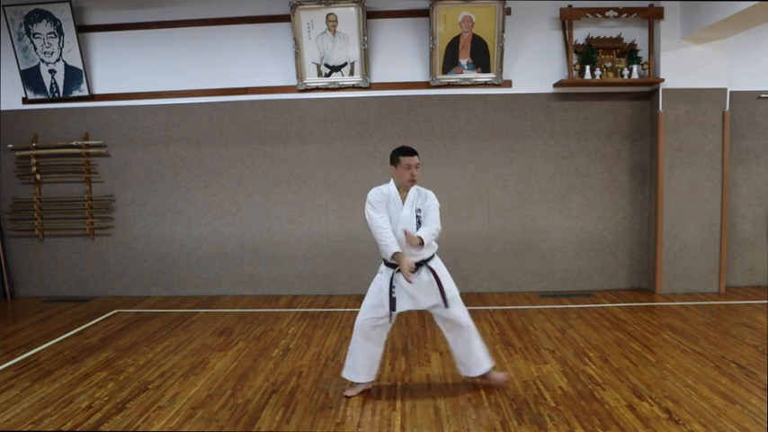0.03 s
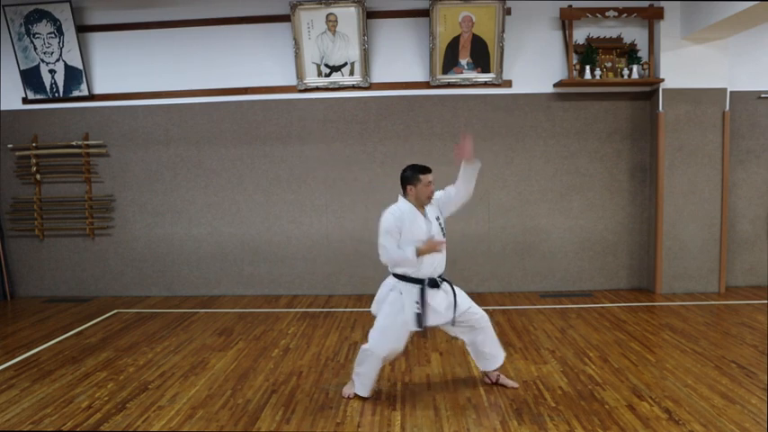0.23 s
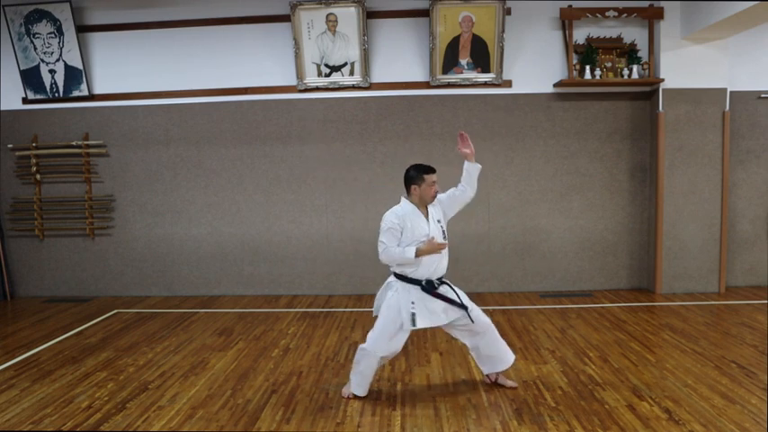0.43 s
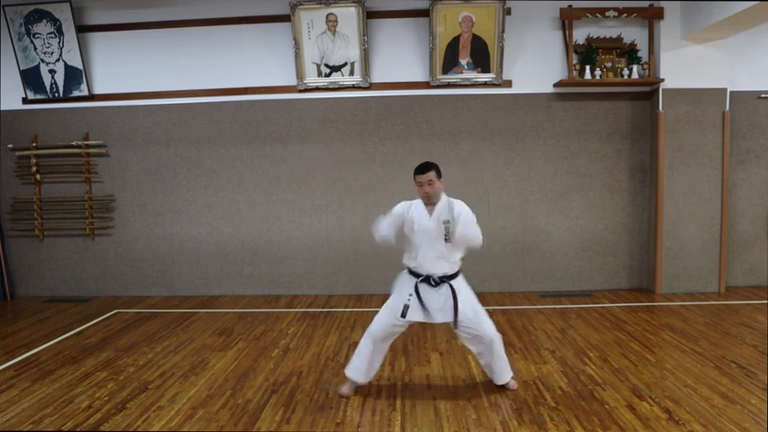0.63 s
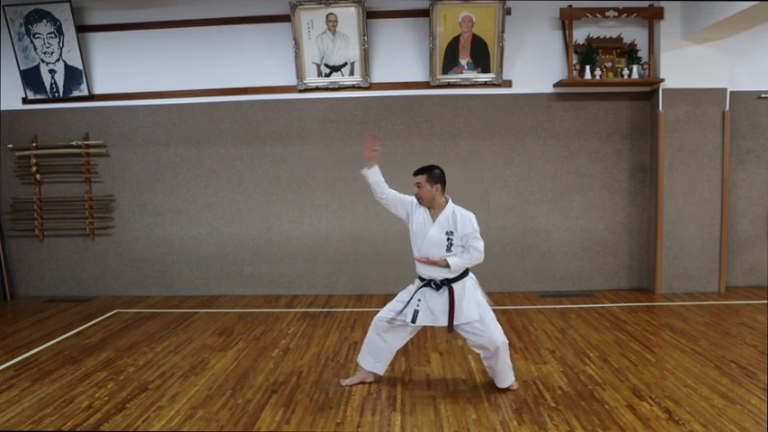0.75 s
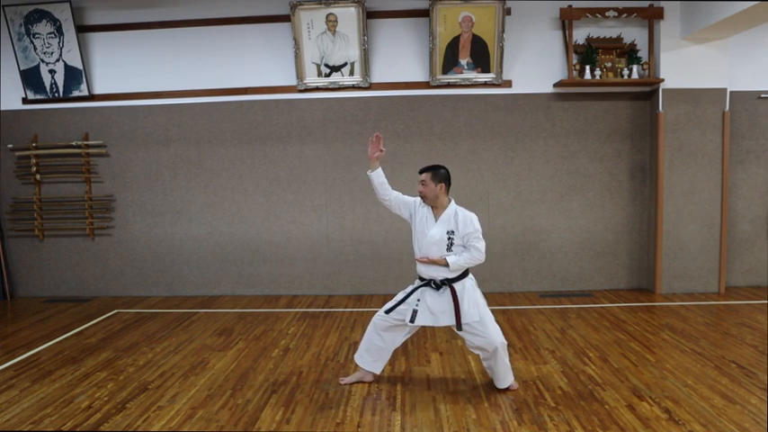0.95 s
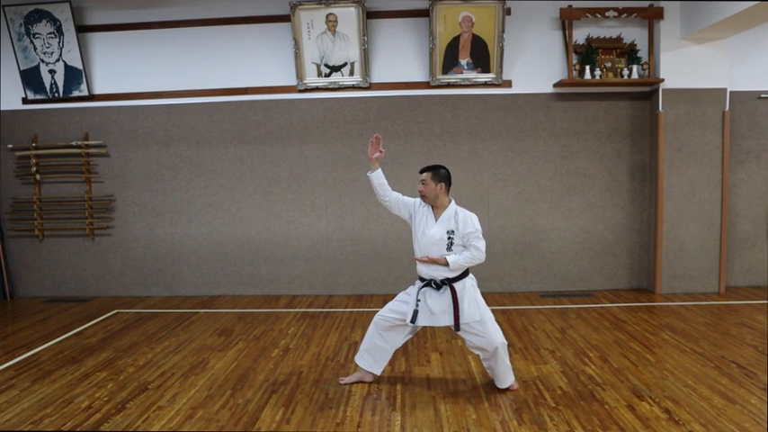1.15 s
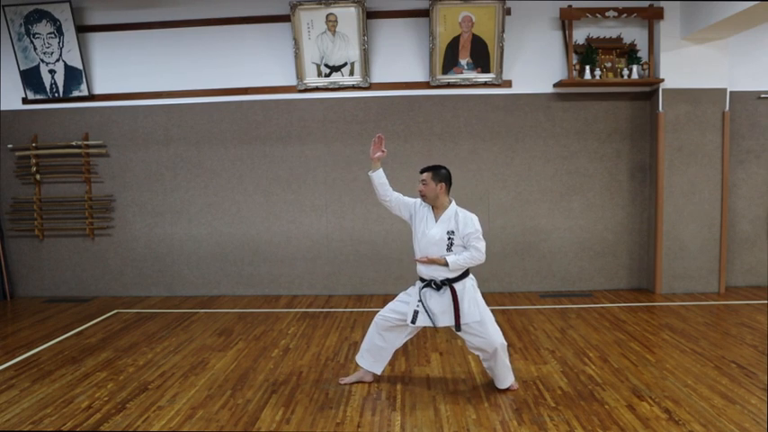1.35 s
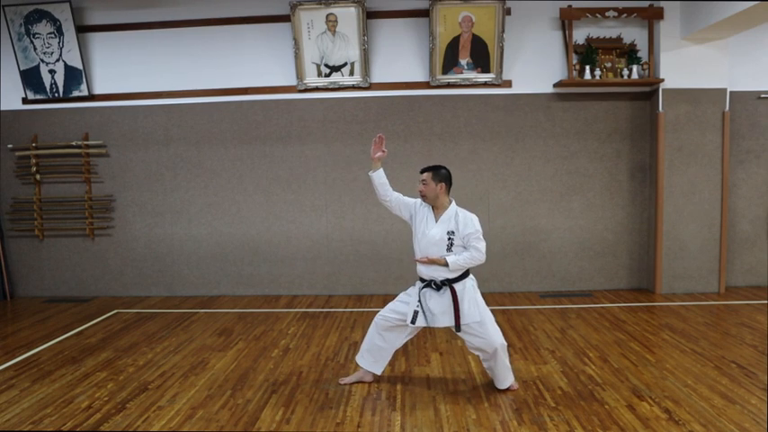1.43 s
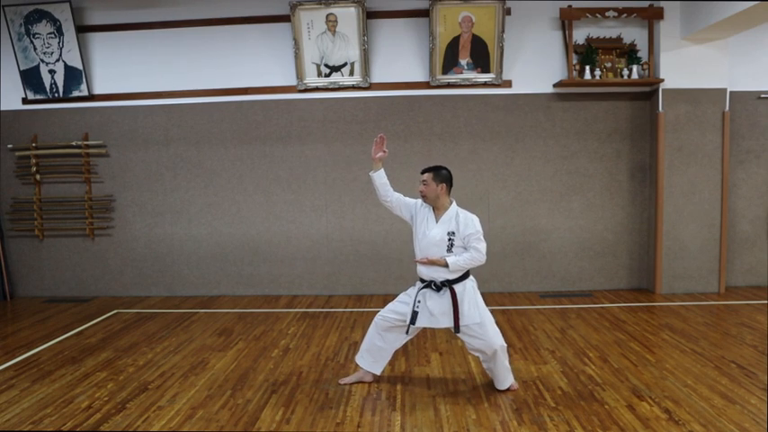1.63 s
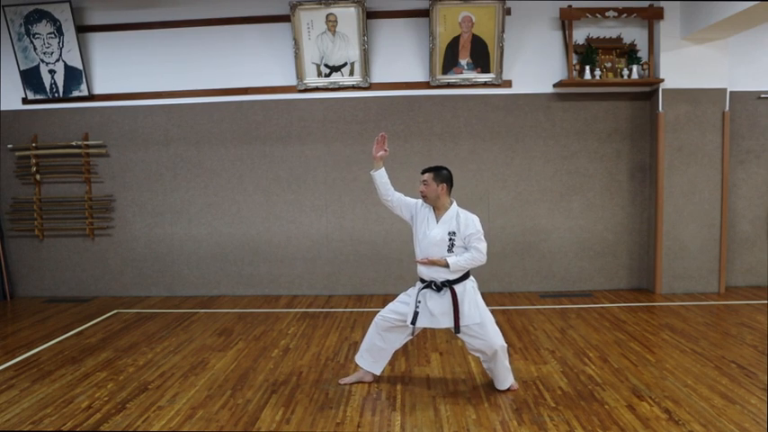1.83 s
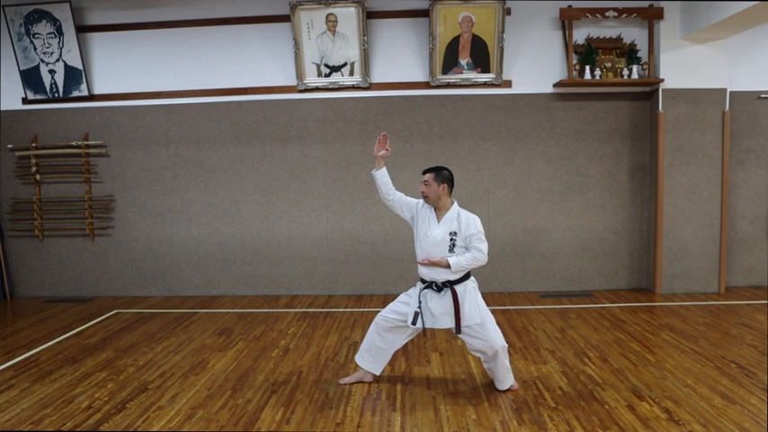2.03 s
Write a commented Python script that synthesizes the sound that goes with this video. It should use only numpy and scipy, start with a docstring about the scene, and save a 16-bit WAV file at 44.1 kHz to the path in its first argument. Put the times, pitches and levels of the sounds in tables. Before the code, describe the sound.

Two sharp cloth snaps from a martial arts uniform, with barefoot thuds on wooden boards.

```python
"""A heavy cotton jacket swishes and snaps taut as a barefoot martial artist strikes twice.
Its cloth sounds through tiny popping creases and rubbing fibres. Stepping into the stance,
the feet shuffle, a sole slaps, and the sprung wooden floor booms under the weight.
The hall throws the snaps back over the low rumble and hum of its ventilation."""
import sys
import numpy as np
from scipy import signal
from scipy.fft import rfft, irfft
from scipy.io import wavfile
from scipy.ndimage import uniform_filter1d

SR = 44100
rng = np.random.default_rng(int(sys.argv[2]) if len(sys.argv) > 2 else 0)


def bounce(signal):
    """Save signal as a 16-bit WAV file at the path given by the first command-line argument."""
    frames = np.transpose(np.atleast_2d(signal))
    limited = np.clip(frames, -1, 1)
    pcm = np.round(limited * 32767).astype(np.int16)
    wavfile.write(sys.argv[1], SR, pcm)


N = 92610
TIME_S = np.arange(N) / SR

# ventilation spectrum (frequency [Hz], relative density [dB])
RUMBLE_COLOUR = [(20, -37), (45, -3.5), (72, -8), (91, -0.5), (114, -8.5), (141, -4.5), (226, -18),
                 (282, -16), (350, -19.5), (560, -28), (640, -30), (900, -36.5), (1640, -40), (2400, -46),
                 (4000, -48.5), (8400, -59.3), (12300, -65), (14500, -84)]
# ventilation stereo width (frequency [Hz], side gain [dB])
RUMBLE_WIDTH = [(100, 1.5), (600, 0.5), (2300, -3.5), (10000, -1.5)]
# fan tones (frequency [Hz], mid-scene level [dB])
FAN_TONES = [(86.1, -34.5), (349.5, -50), (393, -59.5)]
# sliding soles (frequency [Hz], relative density [dB])
SHUFFLE_COLOUR = [(100, -0.5), (220, 1), (500, -1), (750, -8.5), (1200, -23), (4000, -44), (15000, -72)]
# cloth and soles brushing (crest time [s], level [dB], rise [dB/s], fall [dB/s])
SWISHES = [(.045, -45, 43, 77), (0.201, -40.5, 241, 159), (.226, -41.5, 450, 169), (.553, -49, 260, 111),
           (.735, -42.5, 74, 158), (1.958, -56, 600, 300)]
# brushing spectrum (frequency [Hz], relative density [dB])
SWISH_COLOUR = [(200, -6), (700, -1.5), (1500, -4), (3000, -6.5), (6000, -14.5), (11500, -16), (15000, -32)]
# loose sleeve flaps (time [s], level [dB], pitch [Hz])
FLAPS = [(0.056, -38, 504), (0.223, -31.5, 499), (0.313, -27, 560), (0.37, -29.5, 736.3), (0.766, -17, 911),
         (.786, -19.5, 647), (0.835, -23, 652)]
# puff of a flap (frequency [Hz], relative density [dB])
PUFF_COLOUR = [(100, -9), (250, -4), (400, -1), (650, 3), (950, -2.5), (1400, -1.5), (3000, -10.5),
               (8000, -18), (15000, -57)]
# skin on wood (frequency [Hz], relative density [dB])
SLAP_COLOUR = [(100, -12), (500, 15), (1200, -3), (2250, 2.5), (3200, -9), (4300, -13), (6000, -7),
               (11500, -12), (15000, -30)]
# board rung by the heel (frequency [Hz], level [dB], t60 [s])
BOARD_MODES = [(2170, -25, 0.024), (3430, -31.5, 0.021), (4180, -33, 0.022), (5560, -41, 0.01)]
# weight on the boards (onset [s], level [dB], pitch [Hz], swell [s])
THUMPS = [(0.208, -6, 77.7, 0.017), (0.2545, -8, 112, 0.007), (0.276, -8.5, 87.6, 0.01),
          (0.323, -16.5, 142.6, 0.008), (0.364, -12, 125, 0.0061), (0.389, -7.5, 69, 0.0058),
          (.437, -14.5, 69.5, 0.014), (0.48, -18.5, 75.3, 0.019), (0.65, -15, 69.5, 0.01),
          (0.818, -21, 55, 0.012), (1.321, -23, 86, 0.018), (1.358, -23, 100, 0.017)]
# floor cavity and hall bass response (frequency [Hz], gain [dB])
BOOM_COLOUR = [(20, -33), (40, -3.5), (62, 2.5), (90, -43), (130, -3), (200, 0.5), (400, -15), (1000, -33),
               (4000, -80)]
# sleeve sweeps (crest time [s], level [dB], rise [dB/s], fall [dB/s])
WHOOSHES = [(0.279, -31.5, 230, 300), (0.728, -36, 300, 160)]
# air past the sleeve (frequency [Hz], relative density [dB])
WHOOSH_COLOUR = [(150, -27), (450, -2), (750, -0.5), (1100, 3), (1500, -12.5), (2200, -13), (14000, -54)]
# jacket snaps (crest time [s], level [dB], rise [dB/s], fall [dB/s], hold [s])
SNAPS = [(.313, -15, 760, 798, 0.0035), (0.794, -17, 699, 950, 0.017)]
# one spectrum per snap (frequency [Hz], relative density [dB])
SNAP_COLOURS = [
    [(120, -29), (240, -9), (370, -2.5), (830, -8), (1500, -6), (2350, -2), (3100, -4), (3900, -9),
     (6500, -16.5), (11800, -24.5), (14500, -40)],
    [(120, -21), (240, -44), (400, -2), (635, -6), (1080, -6), (1740, -1), (3600, -3.5), (4200, -8.5),
     (6200, -11), (7300, -23.5), (11400, -21.5), (14500, -41)],
]
# cuff crack (frequency [Hz], relative density [dB])
CUFF_COLOUR = [(200, -29), (1700, -22), (2400, 3), (3050, 2), (3900, -33), (14000, -48)]
# snap panning (frequency [Hz], left minus right [dB])
SNAP_BALANCE = [(400, 5.5), (1260, -3.5), (2300, -3), (4200, -1.5), (7800, 0)]
# hall decay (frequency [Hz], t60 [s])
HALL_DECAY = [(150, 0.5), (660, 0.81), (1700, 0.626), (4500, 0.4934), (9000, .5), (14000, 0.62)]
# hall tail spectrum (frequency [Hz], gain [dB])
HALL_COLOUR = [(100, -5), (600, 4), (1500, 3.5), (3000, 0.5), (5000, 0), (9000, -2), (14000, 2.5)]
# standing waves (frequency [Hz], level [dB], t60 [s])
HALL_MODES = [(649, -63, 0.32), (1315, -65.5, 0.46), (1830, -70, 0.45)]
# overall stereo width (frequency [Hz], side gain [dB])
STEREO_WIDTH = [(30, -55), (90, -51), (160, -29.5), (320, -15.5), (600, -7), (1200, 0.5), (2300, 3.5),
                (5000, 5.5), (10000, 5.5)]


def amp(db):
    """Decibels to gain."""
    return 10 ** (np.asarray(db) / 20)


def unit_rms(x):
    """Scales to an rms of one."""
    return x / np.sqrt(np.mean(x ** 2) + 1e-20)


def lookup(table, hz):
    """Interpolates a table over log frequency."""
    table_hz, values = np.transpose(table)
    return np.interp(np.log(hz + 1), np.log(table_hz + 1), values)


def colour(x, curve):
    """Filters by a curve of (frequency [Hz], gain [dB])."""
    n = x.shape[-1]
    return irfft(rfft(x) * amp(lookup(curve, np.fft.rfftfreq(n, 1 / SR))), n)


def widen(x, curve):
    """Filters the side signal; the mid passes unchanged."""
    padded_side = np.pad((x[0] - x[1]) / 2, (SR, SR), "reflect", reflect_type="odd")
    mid, side = x.mean(0), colour(padded_side, curve)[SR:SR + N]
    return np.array([mid + side, mid - side])


def crest(at_s, rise_db_per_s, fall_db_per_s, hold_s=0):
    """Rise, hold and fall envelope, linear in dB, peaking at one."""
    before_db = (at_s - hold_s / 2 - TIME_S) * rise_db_per_s
    after_db = (TIME_S - at_s - hold_s / 2) * fall_db_per_s
    return amp(-np.maximum(0, np.maximum(before_db, after_db)))


def crackle(curve, hiss, correlation=0.9, pops_per_s=8000):
    """Tiny pops, as of creases, plus friction hiss; stereo, unit rms."""
    sizes = amp(-0.5 * np.minimum(rng.exponential(1, (2, N)), 2))
    pops = sizes * rng.choice([-1., 1.], (2, N)) * (rng.random((2, N)) < pops_per_s / SR)
    mid, side = unit_rms(pops) + hiss * rng.standard_normal((2, N))
    mid *= np.sqrt((1 + correlation) / 2)
    side *= np.sqrt((1 - correlation) / 2)
    return unit_rms(colour(np.array([mid + side, mid - side]), curve))


def ventilation_rumble(level_db=-26):
    """Ventilation air rumbles from all sides, its spectrum drifting in patches."""
    frames, hz = N // 512 + 6, np.fft.rfftfreq(2048, 1 / SR)
    left_re, left_im, right_re, right_im, drift = rng.standard_normal((frames, len(hz), 5)).T
    drift = uniform_filter1d(drift, size=14, axis=0)
    patches_db = unit_rms(uniform_filter1d(drift, size=8, axis=1))
    noise = np.array([left_re + 1j * left_im, right_re + 1j * right_im])
    spectra = noise * amp(lookup(RUMBLE_COLOUR, hz)[:, None] + patches_db)
    rumble = unit_rms(signal.istft(spectra, nperseg=2048, noverlap=1536)[1][:, :N])
    return amp(level_db) * widen(rumble, RUMBLE_WIDTH)


def fan_hum(waver_depth=0.39, waver_hz=5, swell_db_per_s=2):
    """Fan tones waver and slowly swell."""
    out = np.zeros(N)
    waver_band = np.exp(-(np.fft.fftfreq(N, 1 / SR) / waver_hz) ** 2)
    swell_db = swell_db_per_s * (TIME_S - TIME_S.mean())
    for hz, db in FAN_TONES:
        drift = np.fft.ifft(waver_band * np.exp(2j * np.pi * rng.random(N)))
        tone = (1 + waver_depth * drift / drift.std()) * np.exp(2j * np.pi * hz * TIME_S)
        out += amp(db + swell_db) * unit_rms(tone.real)
    return out


def foot_shuffle(level_db=-35):
    """Soles slide and pivot dully into the stance."""
    friction = crackle(SHUFFLE_COLOUR, hiss=3.6, correlation=0.78)
    return friction * amp(level_db) * crest(at_s=0.46, rise_db_per_s=10.5, fall_db_per_s=84)


def swishes():
    """Cloth and soles brush softly as the body turns."""
    envelope = sum(amp(db) * crest(at_s, *slopes) for at_s, db, *slopes in SWISHES)
    return crackle(SWISH_COLOUR, hiss=3.5, correlation=0.78) * envelope


def sleeve_flaps(wander_rms_hz=30.6, note_to_puff=1.41):
    """Loose cloth billows: a dull puff and a short hollow note."""
    out, puff = np.zeros((2, N)), crackle(PUFF_COLOUR, hiss=0.9)
    for at_s, db, hz in FLAPS:
        wander_hz = wander_rms_hz * unit_rms(uniform_filter1d(rng.standard_normal(N), size=120))
        note = note_to_puff * np.sin(2 * np.pi * np.cumsum(hz + wander_hz) / SR)
        out += unit_rms(puff + note) * amp(db) * crest(at_s, rise_db_per_s=2202, fall_db_per_s=608)
    return out


def sole_slap(sole_s=0.1995, sole_db=-22.5, heel_s=0.2014):
    """Skin lands on varnished wood, then the heel rings the board."""
    envelope = amp(sole_db) * crest(sole_s, rise_db_per_s=3300, fall_db_per_s=2300)
    age_s = np.maximum(TIME_S - heel_s, 0)
    board = sum(amp(db - 60 * age_s / t60_s) * np.sin(2 * np.pi * hz * age_s)
                for hz, db, t60_s in BOARD_MODES)
    return crackle(SLAP_COLOUR, hiss=0.43) * envelope + board


def floor_thumps():
    """Each push swings the sprung floor for a few cycles."""
    out = np.zeros(N)
    for onset_s, db, hz, swell_s in THUMPS:
        age_s = np.maximum(TIME_S - onset_s, 0)
        envelope = (age_s / swell_s * np.exp(1 - age_s / swell_s)) ** 2
        out += amp(db) * envelope * np.sin(2 * np.pi * hz * age_s)
    return out


def floor_boom(thumps, t60_s=0.5, build_s=0.021):
    """The floor cavity and the hall keep the bass rolling."""
    tail = rng.standard_normal(N) * amp(-60 * TIME_S / t60_s) * (1 - np.exp(-TIME_S / build_s))
    spectrum = rfft(tail)
    whitened = irfft(spectrum / np.sqrt(uniform_filter1d(abs(spectrum) ** 2, size=60)), N)
    return signal.fftconvolve(thumps, colour(whitened, BOOM_COLOUR)[:SR])[:N]


def sleeve_whooshes():
    """Air rushes past the sleeve before each snap."""
    envelope = sum(amp(db) * crest(at_s, *slopes) for at_s, db, *slopes in WHOOSHES)
    return crackle(WHOOSH_COLOUR, hiss=2.1) * envelope


def jacket_snaps(hiss=0.85, cuff_s=0.3105, cuff_db=-13.5):
    """The sleeve whips taut twice, treble leaning right; the cuff cracks on the first strike."""
    sleeve = sum(crackle(curve, hiss) * crest(at_s, *shape) * amp(db)
                 for (at_s, db, *shape), curve in zip(SNAPS, SNAP_COLOURS))
    cuff_envelope = amp(cuff_db) * crest(cuff_s, rise_db_per_s=1800, fall_db_per_s=1400)
    left, right = sleeve + crackle(CUFF_COLOUR, hiss) * cuff_envelope
    return np.array([colour(left, [(hz, db / 2) for hz, db in SNAP_BALANCE]),
                     colour(right, [(hz, -db / 2) for hz, db in SNAP_BALANCE])])


def floor_reflection(x, delay_s=0.00292, gain_db=-6.5):
    """Direct sound plus its mirror image off the hard floor: a comb filter."""
    return x + amp(gain_db) * np.pad(x, ((0, 0), (round(delay_s * SR), 0)))[:, :N]


def hall_reverb(x, tail_db=-4.5, build_s=0.0046):
    """A diffuse tail, longest in the mids, with a few standing waves."""
    hz, frame_s, spectra = signal.stft(rng.standard_normal((2, N)), SR, nperseg=256)
    decay = amp(-60 * frame_s / lookup(HALL_DECAY, hz)[:, None])
    tail = signal.istft(spectra * decay, SR, nperseg=256)[1][:, :N]
    tail *= 1 - np.exp(-TIME_S / build_s)
    tail = amp(tail_db) * colour(tail / np.linalg.norm(tail[0]), HALL_COLOUR)
    tail += sum(amp(db - 60 * TIME_S / t60_s) * np.sin(2 * np.pi * mode_hz * TIME_S)
                for mode_hz, db, t60_s in HALL_MODES)
    return signal.fftconvolve(x.mean(0)[None], tail[:, :SR], axes=1)[:, :N]


def scene():
    """Cloth and feet in the ventilated hall."""
    bright = floor_reflection(jacket_snaps()) + sleeve_flaps() + sleeve_whooshes()
    bright += swishes() + sole_slap()
    thumps = floor_thumps()
    movement = bright + hall_reverb(bright) + foot_shuffle() + thumps + floor_boom(thumps)
    return movement + ventilation_rumble() + fan_hum()


def record(dry):
    """Narrows the bass, widens the treble, then low-passes."""
    cutoff_hz = 14600
    lowpass = signal.firwin(255, cutoff_hz, window=("kaiser", 9), fs=SR)
    wide = np.pad(widen(dry, STEREO_WIDTH), ((0, 0), (127, 127)), "reflect", reflect_type="odd")
    return signal.oaconvolve(wide, lowpass[None], "valid")


dry = scene()
out = record(dry)
bounce(out)
```